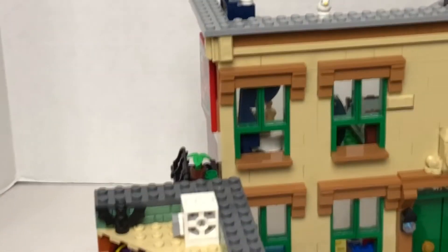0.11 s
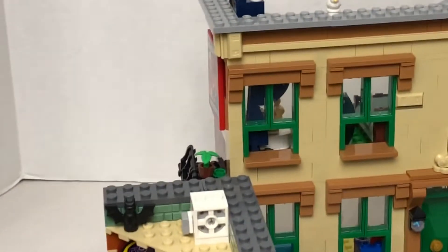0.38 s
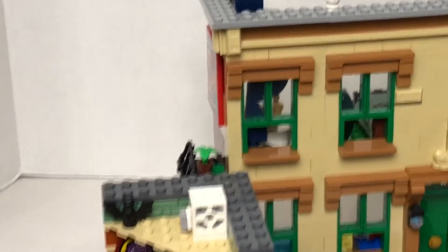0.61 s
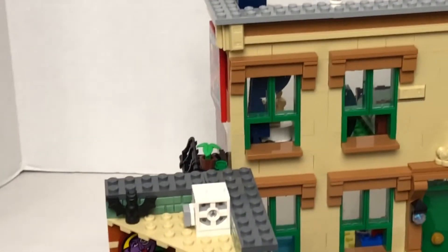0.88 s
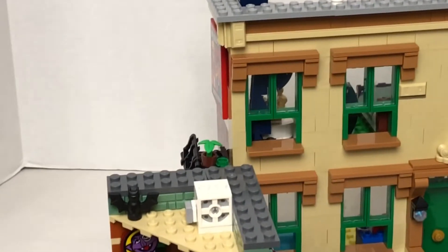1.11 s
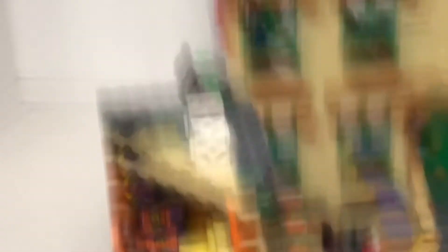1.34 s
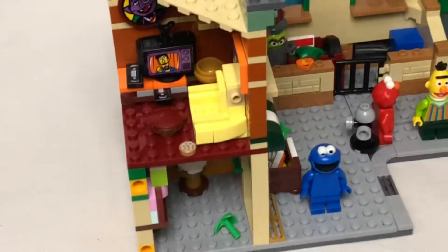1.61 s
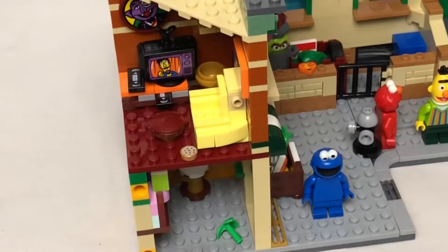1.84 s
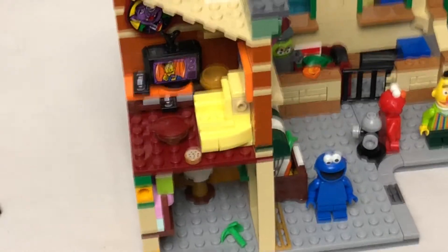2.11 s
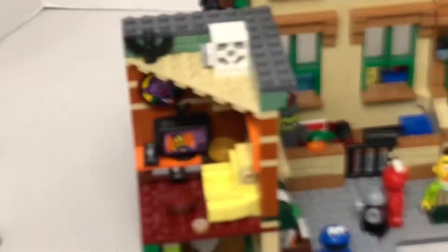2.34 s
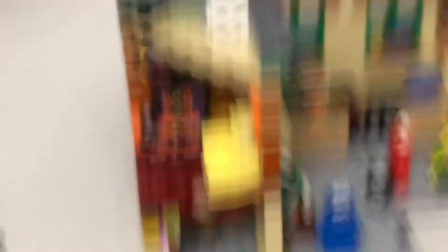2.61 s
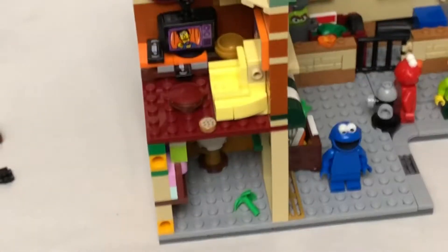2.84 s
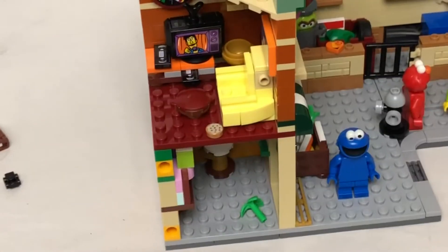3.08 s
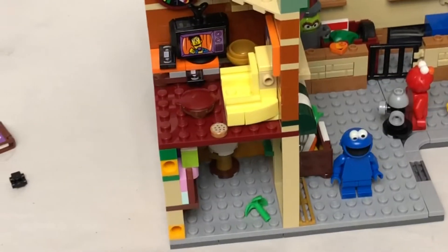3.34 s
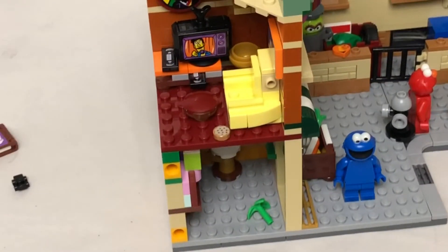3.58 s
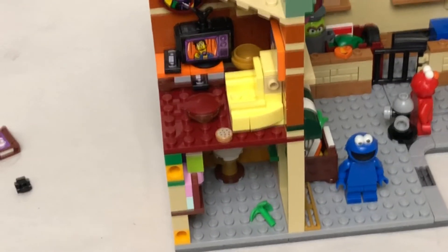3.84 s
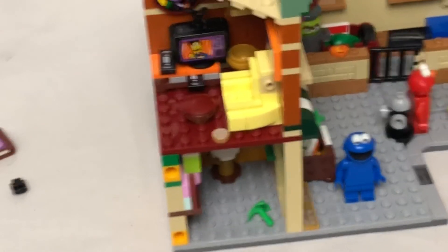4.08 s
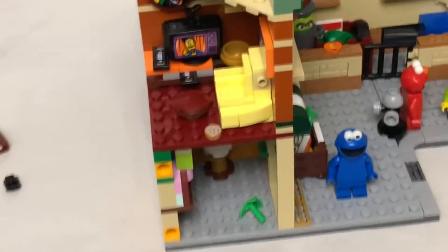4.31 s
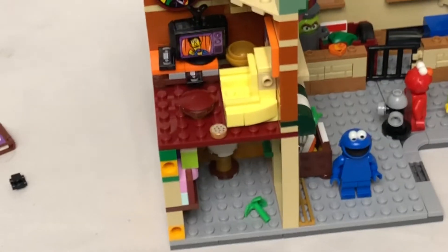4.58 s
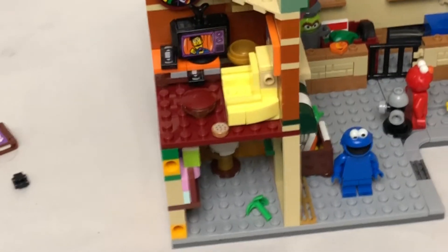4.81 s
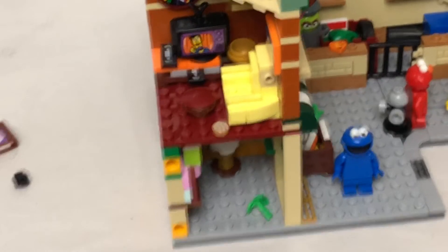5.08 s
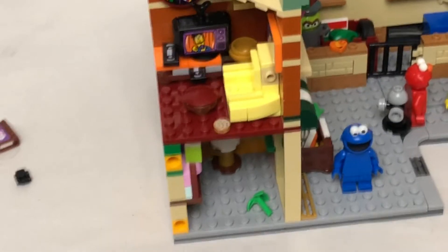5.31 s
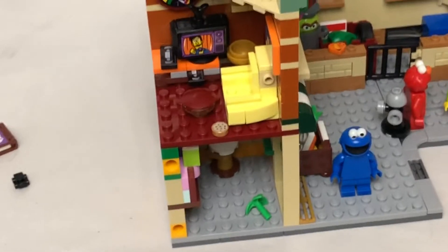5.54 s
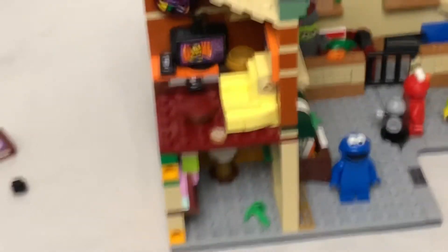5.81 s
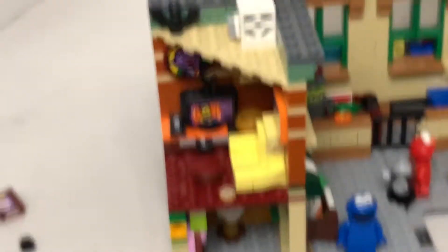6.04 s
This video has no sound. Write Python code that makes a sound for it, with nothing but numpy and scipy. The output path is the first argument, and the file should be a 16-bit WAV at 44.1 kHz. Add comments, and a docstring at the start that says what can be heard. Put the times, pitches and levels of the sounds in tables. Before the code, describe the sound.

A quiet indoor room with faint hiss and low rumble, recorded very close. Soft finger rubbing and a few tiny clicks fill the first second. At 1.24 s a hard, very loud plastic snap strikes with a table thump, bright little bounces and a brief hollow hum. Small knocks follow, then an equally loud snap at 2.14 s, with three or four ticking bounces and quick rocking thuds; looser clacks rattle around 2.4 to 2.5 s with a faint thin ringing. A single crisp clack lands at 2.85 s. It is almost still until 3.8 s, when hands shuffle and skin rubs dryly; a blunt tap on the camera body comes at 4.0 s. From about 4.8 to 5.25 s a base drags in low stuttering slips, growing stronger. Medium clicks cluster at 5.6 to 5.76 s, the last sharpest, then soft body taps and one more click near 5.95 s.

```python
"""Plastic building pieces on a table

Small pieces are pressed, snapped and dropped close to a microphone in a quiet room. Contacts are bursts of
noise through resonances; tiny loose parts, a thin part and a wall of the model ring as decaying sines.
Knocks through the table and a dragged base are sines that sag in pitch; taps on the camera body dive.
Finger rubs, shuffling hands and the floor are coloured noise; a diffuse room tail answers the contacts."""
import sys
import numpy as np
from scipy import signal
from scipy.fft import rfft, irfft
from scipy.io import wavfile
from scipy.ndimage import uniform_filter1d, map_coordinates

SR = 44100
rng = np.random.default_rng(int(sys.argv[2]) if len(sys.argv) > 2 else 0)


def persist_wave(psi):
    """Save psi, clipped to +-1, as 16-bit WAV."""
    counts = np.round(np.clip(psi, -1, 1) * 32767).astype(np.int16)
    wavfile.write(sys.argv[1], SR, np.atleast_2d(counts).T)


def undo_db(level):
    """Turn decibels back into plain size, where 20 dB means ten times bigger."""
    steps = np.asarray(level, float) / 20
    return 10 ** steps


N = 272297


def unit(x):
    """Scales to rms 1."""
    return x / np.sqrt(np.mean(x ** 2) + 1e-20)


def along(points, hz):
    """Interpolates (f/Hz, value) points on a log frequency axis."""
    f, v = np.transpose(points)
    return np.interp(np.log(hz + 1), np.log(f + 1), v)


def coloured(response):
    """Noise of rms 1 shaped by a gain per frequency."""
    spectrum = rfft(rng.standard_normal(N))
    return unit(irfft(spectrum * response(np.fft.rfftfreq(N, 1 / SR)), N))


def wobble(rate_hz):
    """Smooth random curve with rate_hz knots a second."""
    knots = rng.standard_normal(int(N * rate_hz / SR) + 4)
    return map_coordinates(knots, [np.arange(N) * rate_hz / SR])


def fading(t, t60_ms, rise_ms):
    """Quick rise times exponential fall."""
    return (1 - np.exp(-1000 * t / rise_ms)) * undo_db(-60000 * t / t60_ms)


def tone(t, hz):
    """Sine at a random phase."""
    return np.sin(2 * np.pi * (hz * t + rng.random()))


def add(track, s, sound):
    """Mixes a sound in at s seconds."""
    part = track[int(round(s * SR)):][:len(sound)]
    part += sound[:len(part)]


# finger strokes over plastic: start/s, end/s, level/dB, treble/dB
RUB_STROKES = [(-.02, 0.135, -73.5, 7.5), (0.121, 0.17, -68, 10), (0.158, 0.3, -72.5, 10),
               (1.95, 2.06, -72.5, 10), (3.847, 3.993, -64, -4), (3.986, 4.211, -65, 2.5),
               (4.043, 4.126, -62.5, 26), (4.203, 4.318, -64, 5), (4.669, 4.716, -72.5, -4),
               (4.84, 4.87, -75, -7.5), (5.274, 5.325, -66, -14.5), (5.394, 5.619, -70.5, 0.5)]
# skin friction spectrum: f/Hz, gain/dB
SKIN_COLOUR = [(350, -50), (600, 5.5), (1900, 1.5), (2830, 2.5), (3300, -6.5), (4840, 0.5), (10900, -10),
               (16000, -10.5)]
# resonances of the rubbed piece: f/Hz, width/Hz, level/dB
RUBBED_PIECE = [(3130, 86, -0.5), (3680, 110, -1), (4850, 110, -6), (7160, 160, -6.5), (10900, 160, -4.5)]


def rubs():
    """Skin slides over plastic: patchy noise swells per stroke; the grip changes which resonances sing."""
    t, out = np.arange(N) / SR, 0
    for start, end, db, treble_db in RUB_STROKES:
        grip = [(c * rng.normal(1, .01), w, g + rng.normal(0, 2.5)) for c, w, g in RUBBED_PIECE]

        def skin(f):
            rings = sum(undo_db(g + 8.5) * w / np.hypot(2 * (f - c), w) for c, w, g in grip)
            high = (f / 9000) ** 2
            return undo_db(along(SKIN_COLOUR, f)) * (1 + rings) * (1 + undo_db(treble_db) * high / (1 + high))

        swell = np.abs(np.sin(np.pi * np.clip((t - start) / (end - start), 0, 1))) ** 0.53
        out = out + undo_db(db) * swell * coloured(skin)
    z = signal.stft(out, nperseg=256)[2]
    patches = uniform_filter1d(rng.standard_normal(z.shape), size=5, axis=0)  # across frequency
    patches = uniform_filter1d(patches, size=8, axis=1)  # across time
    out = signal.istft(z * undo_db(2.1 * unit(patches)), nperseg=256)[1][:N]
    return out * undo_db(0.63 * wobble(55) + 0.55 * wobble(350))


# hand activity: t/s, level/dB
HAND_LEVELS = [(0, -67), (0.299, -69.5), (1.2, -75), (1.7, -68), (2.6, -64), (3.099, -76), (3.73, -72),
               (3.8, -57), (3.88, -66.5), (4.199, -67), (4.5, -76.5), (5.2, -65.5), (5.9, -61), (6.17, -79)]
# shuffling spectrum: f/Hz, gain/dB
SHUFFLE_COLOUR = [(60, -31.5), (120, -3.5), (200, 0), (400, -8), (900, -24.5), (2000, -50)]


def hand_level():
    """Gain of the hand activity over time."""
    return undo_db(np.interp(np.arange(N) / SR, *np.transpose(HAND_LEVELS)))


def hands():
    """Lumpy low noise of hands and camera shifting."""
    lumps = undo_db(3.5 * wobble(25))
    return hand_level() * unit(lumps * coloured(lambda f: undo_db(along(SHUFFLE_COLOUR, f))))


# hiss and rumble spectrum: f/Hz, gain/dB
FLOOR_COLOUR = [(28, -12.5), (52, 7.5), (70, 2.5), (120, -8.5), (250, -14.5), (500, -14.5), (1000, -22),
                (5000, -28.5), (12000, -32), (15800, -33.5), (16300, -49.5)]
FLOOR_DB = -67.5


def floor():
    """Faint hiss and rumble: coloured noise with a slightly wavering level."""
    return undo_db(FLOOR_DB + 0.18 * wobble(2.8)) * coloured(lambda f: undo_db(along(FLOOR_COLOUR, f)))


# plastic contacts: t/s, level/dB, body/dB, edge/dB, room/dB (lower when close to the microphone)
CONTACTS = [(0.3665, -55, -6.5, -2, 10), (0.452, -60.5, 0, -5, -4), (0.641, -46, -3.5, -0.5, -6),
            (1.218, -59.5, 3, -1, 23), (1.2407, -9.5, -11, 4.5, -1), (1.2427, -12, -6.5, -7, 3),
            (1.395, -49.5, 6, -1.5, 9.5), (1.661, -63, 4, -16, -0.5), (1.8576, -44.5, 9, -8.5, -2),
            (2.118, -55, -0.5, -5, 7), (2.1397, -8, -10.5, -3, 0), (2.397, -40.5, 4, 5, 0),
            (2.4376, -40, 2.5, -16, 6.5), (2.459, -40, -14, -13, -4.5), (2.4747, -24, -7.5, -9, 7),
            (2.4928, -33, -2.5, -4, -7), (2.5, -46, 3, -4, -2), (2.756, -41, -1, -10.5, 0),
            (2.8531, -17, -12, -6, -0.5), (2.914, -54.5, 7, -2.5, 3), (3.8995, -47.5, -16.5, -13.5, -3),
            (3.9979, -45, -7.5, -3, 4), (4.6677, -58, -5.5, -12.5, -0.5), (4.683, -56.5, -5, -2, 0.5),
            (4.956, -69, 8.5, -3.5, -3), (5.052, -75, 9, -6, -1), (5.14, -40, -3.5, -8, 1.5),
            (5.1767, -45.5, 8, -13, -2), (5.413, -55, 1.5, -3.5, 1), (5.432, -56, 1.5, -8, -2),
            (5.596, -51.5, 12.5, -17, 1), (5.6177, -31.5, -3, -1, -2), (5.6278, -34.5, 2, -18, -10),
            (5.6348, -36.5, 0.5, -0.5, 3.5), (5.7204, -28, -2.5, -5, 1), (5.763, -19, -7, -4.5, 0.5),
            (5.9438, -49, 2.5, -17, -1), (5.975, -28.5, -3.5, -10, -0.5)]
# crack regions body, middle, edge: low/Hz, high/Hz (capped at 0.45 SR), share of CRACK_T60_MS
CRACK_REGIONS = [(700, 2810, 1.8), (2780, 7000, 0.73), (6550, 34000, 0.53)]
# resonances of the pieces: f/Hz, width/Hz, level/dB
PIECE_MODES = [(1295, 110, 4.5), (1696, 150, 3.5), (2180, 200, 4), (2960, 260, 1), (3669, 580, 6.5),
               (4170, 160, 7), (4500, 710, 0.5), (5650, 260, -1.5), (8300, 660, 4)]
CRACK_T60_MS = 23
SNAP_DB, RING_IN_ROOM_DB = -9.5, -7  # snap relative to crack; ringing in the walls' feed


def clicks():
    """Snap and noise crack ring the pieces, treble dying first; also returns pulses for the room, each with its
    crack band's energy scaled by the contact's room level."""
    out, spread, t = np.zeros(N), np.zeros(N), np.arange(4096) / SR
    f = np.fft.rfftfreq(len(t), 1 / SR)

    def mode(c, w, db):
        return undo_db(db) * 1j * f * w / (c * c - f * f + 1j * f * w)

    bands = [signal.butter(3, [lo, min(hi, .45 * SR)], "band", fs=SR, output="sos")
             for lo, hi, _ in CRACK_REGIONS]
    for s, db, body_db, edge_db, room_db in CONTACTS:
        rings = sum(mode(c * rng.normal(1, 0.022), w, g + rng.normal(0, 2.5)) for c, w, g in PIECE_MODES)
        noise = irfft(rfft(rng.standard_normal((len(CRACK_REGIONS), len(t)))) * (1 + rings))
        snap, pulse = irfft(1 + rings), irfft(1 + undo_db(RING_IN_ROOM_DB) * rings)
        region_dbs = (body_db, 0, edge_db)
        for band, grit, region_db, (_, _, share) in zip(bands, noise, region_dbs, CRACK_REGIONS):
            crack = unit(signal.sosfilt(band, grit)) * fading(t, share * CRACK_T60_MS, rise_ms=0.16)
            crack = undo_db(db + region_db - 4.0) * crack
            size = np.linalg.norm(crack)
            first = signal.sosfilt(band, snap)
            bare = signal.sosfilt(band, pulse)
            crack = crack + undo_db(SNAP_DB) * first * size / np.linalg.norm(first)
            add(out, s - .0003, crack)
            add(out, s + 0.0055, undo_db(-18.5) * crack)  # bounce off the table top
            add(spread, s, undo_db(room_db) * bare * size / np.linalg.norm(bare))
    return out, spread


# reverberation time: f/Hz, t60/s
ROOM_T60 = [(300, 0.14), (1500, 0.43), (3500, 0.52), (5200, 0.45), (7000, 0.32), (9500, 0.33),
            (15000, 0.32)]
# tail spectrum: f/Hz, gain/dB
TAIL_COLOUR = [(500, -2.5), (900, -3), (1500, 2.7), (2400, -2.5), (3400, 0.1), (4500, -5.5), (6500, -1.5),
               (10000, -8.5), (15000, -11)]


def room(x):
    """Diffuse noise tail, each frequency with its own decay; every 4096-sample block gets a fresh tail."""
    out, step = np.zeros(N + SR), 4096
    for start in range(0, N, step):
        hz, t, z = signal.stft(rng.standard_normal(SR // 2), SR, nperseg=256)
        decay_db = along(TAIL_COLOUR, hz)[:, None] - 60 * t / along(ROOM_T60, hz)[:, None]
        tail = signal.istft(z * undo_db(decay_db), SR, nperseg=256)[1]
        answer = signal.fftconvolve(x[start:start + step], tail / np.linalg.norm(tail))
        add(out, start / SR + .006, answer)
    return out[:N]


# hollow of the model: f/Hz, level/dB, t60/ms
HOLLOW_MODES = [(335, -3.5, 12), (491, -4.5, 25.6), (614, -3, 24), (800, -9, 7.7), (1153, -2.5, 7.8)]
# table top: f/Hz, level/dB, t60/ms
TABLE_MODES = [(92, -1, 54), (132, 5, 67)]
SWING_CYCLES = 8.3  # cycles until the swing is 60 dB down


def knock(rows):
    """Bending waves bring highs first: the swing sags in pitch, lower hollow and table modes arrive later."""
    out, t = np.zeros(N), np.arange(8192) / SR
    for s, db, hz, hollow_db in rows:
        cycles = hz * (t + 0.65 * 0.0037 * (1 - np.exp(-t / 0.0019)))
        swing = np.sin(2 * np.pi * cycles) * fading(t, 1000 * SWING_CYCLES / hz, rise_ms=750 / hz)
        add(out, s - .005 + 0.082 / np.sqrt(hz), undo_db(db + 8.0) * swing)
        for modes, part_db, rise_ms in ((HOLLOW_MODES, hollow_db + 4.5, 1.2), (TABLE_MODES, -6, 8)):
            for mode_hz, mode_db, t60_ms in modes:
                ring = tone(t, mode_hz * rng.normal(1, 0.044)) * fading(t, t60_ms, rise_ms)
                travel_s = 0.098 / np.sqrt(mode_hz)
                level_db = db + part_db + mode_db + rng.normal(0, 2.6)
                add(out, s - .005 + travel_s, undo_db(level_db) * ring)
    return out


# single knocks through the table: t/s, level/dB, settled pitch f/Hz, hollow/dB
SINGLE_KNOCKS = [(0.454, -48, 208, -4.5), (0.647, -52, 170, 1), (1.242, -32, 148, 16.5),
                 (1.252, -27, 124, 2), (1.398, -41.5, 212, -9), (1.434, -48, 223, -5.5),
                 (1.647, -52.5, 171, -3.5), (1.801, -49, 171.7, -3), (1.86, -38.5, 162, -1),
                 (1.959, -53.5, 231, -18), (2.111, -42.5, 241, -11), (2.14, -30.5, 164.6, 8),
                 (2.28, -45, 243, -3), (2.441, -40, 148, 0.5), (2.478, -39, 326, 17.5),
                 (2.631, -45.5, 270, -3.5), (2.722, -50.5, 224, -6.5), (2.744, -51.5, 171, 6.5),
                 (2.856, -33.5, 155.7, 1), (3.483, -52.5, 139, -12), (3.773, -44.5, 129.2, -13),
                 (3.805, -44, 179.3, -9.5), (3.832, -49, 159.5, -13.5), (3.903, -40.5, 170, -11),
                 (4.013, -51, 232, 6), (4.028, -53.5, 196, 6), (4.265, -52, 216.3, -8),
                 (4.671, -46.5, 160.5, -9.5), (5.429, -53, 188.3, -9), (5.601, -43, 189, -6.5),
                 (5.618, -40.5, 179, -9), (5.723, -38, 167, 3), (5.764, -32.5, 159, 4.5),
                 (5.978, -34.5, 169, 1)]


def thuds():
    """Single blows bend the table top and ring the hollow model."""
    return knock(SINGLE_KNOCKS)


FUMBLES, FUMBLE_DB, FUMBLE_SCATTER_DB, FUMBLE_HZ, FUMBLE_HOLLOW_DB = 14, -59, 2, 205, -12.5


def fumbles():
    """Faint knocks at chance times, likelier where the hands are busy."""
    busy = np.cumsum(hand_level())
    rows = []
    for _ in range(FUMBLES):
        s = np.searchsorted(busy, rng.random() * busy[-1]) / SR + 0.0099
        db = FUMBLE_DB + FUMBLE_SCATTER_DB * rng.standard_normal()
        hz = FUMBLE_HZ * np.exp(0.15 * rng.standard_normal())
        rows.append((s, db, hz, FUMBLE_HOLLOW_DB))
    return knock(rows)


# hum onsets: t/s, level/dB
WALL_HUMS = [(1.245, -47), (1.861, -65), (2.144, -53), (2.856, -63)]
WALL_HZ, WALL_T60_MS = 1335, 450


def wall():
    """A wall of the model hums on after some blows: one narrow mode, wavering in strength."""
    out, t = np.zeros(N), np.arange(SR // 2) / SR
    for s, db in WALL_HUMS:
        add(out, s, undo_db(db) * tone(t, WALL_HZ) * fading(t, WALL_T60_MS, rise_ms=3.7))
    return out * undo_db(3 * wobble(60))


# bounces of a tiny loose part: t/s, level/dB, edge/dB, lowest mode f/Hz
BOUNCES = [(1.253, -19, 9.5, 4900), (1.2609, -21.5, 3.5, 6300), (1.2836, -28, 2, 6500),
           (1.2935, -26.5, 2.5, 6000), (2.1616, -22, 6.5, 6000), (2.1707, -21.5, 5.5, 5800),
           (2.1802, -23.5, 3.5, 6000), (2.5047, -28, -1, 6000)]
# its modes above the lowest: f/Hz, level/dB, t60/ms
PART_MODES = [(8450, -9, 1.5), (10500, -4.5, 2.4), (13320, -5.5, 1.3), (15280, -3.5, 2.2)]
LOWEST_DB, LOWEST_T60_MS = 1, 3.2


def ticks():
    """A tiny part rings at a few high modes, with new phases at each bounce."""
    out, t = np.zeros(N), np.arange(1024) / SR
    for s, db, edge_db, lowest_hz in BOUNCES:
        modes = [(hz * rng.normal(1, 0.046), mode_db + edge_db, t60_ms) for hz, mode_db, t60_ms in PART_MODES]
        modes.append((lowest_hz, LOWEST_DB, LOWEST_T60_MS))
        for hz, mode_db, t60_ms in modes:
            ring = tone(t, hz) * fading(t, t60_ms, rise_ms=0.056)
            add(out, s - .0003, undo_db(db + mode_db + 7.0) * ring)
    return out


# rocking after hard blows: first knock t/s, level/dB, number of knocks
ROCKINGS = [(2.152, -32, 3), (2.49, -32, 3)]
ROCK_GAP_S, ROCK_HZ, ROCK_HOLLOW_DB = .0105, 127.47, 4


def rocks():
    """The model rocks on its base: evenly spaced knocks of equal level."""
    return knock([(s + k * ROCK_GAP_S, db, ROCK_HZ, ROCK_HOLLOW_DB)
                  for s, db, count in ROCKINGS for k in range(int(count))])


# brushes against a thin hard part: t/s, level/dB
THIN_BRUSHES = [(2.46, -61), (2.5, -58)]
# its modes: f/Hz, level/dB, t60/ms
THIN_MODES = [(3850, 0, 520), (4030, -5, 300), (4200, -9, 220)]


def thin_part():
    """Close narrow modes sing on after each brush, fluttering as the part rattles."""
    out, t = np.zeros(N), np.arange(SR // 2) / SR
    for s, db in THIN_BRUSHES:
        for hz, mode_db, t60_ms in THIN_MODES:
            add(out, s, undo_db(db + mode_db) * tone(t, hz) * fading(t, t60_ms, rise_ms=1.3))
    return out * undo_db(3 * wobble(110))


# fingertip taps on the camera body: t/s, level/dB, starting pitch f/Hz
BODY_TAPS = [(3.9997, -27.5, 1017), (5.92, -37.5, 1013), (5.9468, -42.5, 920)]
TAP_SAG_S, TAP_PEAK_S = .0031, .0024


def taps():
    """Dry push through the shell, highs first: the pitch dives within a few swings and leaves no ring."""
    out, t = np.zeros(N), np.arange(2048) / SR
    swell = (t / TAP_PEAK_S * np.exp(1 - t / TAP_PEAK_S)) ** 2
    for s, db, hz in BODY_TAPS:
        cycles = hz * TAP_SAG_S * (1 - np.exp(-t / TAP_SAG_S))
        add(out, s, undo_db(db) * swell * np.sin(2 * np.pi * cycles))
    return out


# slips of a dragged base: t/s, level/dB
BASE_SLIPS = [(4.783, -56.5), (4.854, -55.5), (4.899, -52), (4.939, -54), (4.956, -49), (5.010, -48),
              (5.021, -52.5), (5.054, -49), (5.07, -47), (5.104, -45.5), (5.157, -44), (5.189, -40.5),
              (5.222, -41), (5.253, -40)]
SLIP_START_HZ, SLIP_END_HZ, SLIP_SAG_S = 735, 144.8, 0.0026  # typical pitches, scattered per slip
SLIP_T60_MS, SLIP_GRIT_DB = 57, -18.5


def slips():
    """A dragged base sticks and slips: each slip jolts the table, highs first, with grit on its front."""
    out, t = np.zeros(N), np.arange(4096) / SR
    for s, db in BASE_SLIPS:
        start_hz = SLIP_START_HZ * np.exp(rng.normal(0, 0.19))
        end_hz = SLIP_END_HZ * rng.normal(1, 0.16)
        cycles = end_hz * t + (start_hz - end_hz) * SLIP_SAG_S * (1 - np.exp(-t / SLIP_SAG_S))
        jolt = -np.sin(2 * np.pi * cycles) * fading(t, SLIP_T60_MS, rise_ms=1.36)
        grit = uniform_filter1d(rng.standard_normal(len(t)), size=4) * fading(t, 40, rise_ms=0.73)
        add(out, s - .001, undo_db(db + 3.5) * (jolt + undo_db(SLIP_GRIT_DB) * grit))
    return out


def scene():
    """Sums all contacts, their room tail, the rubbing and the floor."""
    background = rubs() + hands() + floor()
    cracks, spread = clicks()
    dull = thuds() + fumbles() + rocks()
    bounces = ticks() + thin_part()
    wet = undo_db(-17.0) * room(spread + .5 * bounces + 1.2 * dull)
    return (background + cracks + dull + bounces + wet + wall() + taps() + slips())[None]


def top_cut(x):
    """Nothing passes above the cut-off."""
    return signal.sosfilt(signal.butter(12, 17340, fs=SR, output="sos"), x)


def record(dry):
    """The microphone's bass cut, then a steep band limit."""
    bass_cut = signal.sosfilt(signal.butter(2, 45, "high", fs=SR, output="sos"), dry)
    limited = signal.sosfilt(signal.cheby2(12, 70, 17500, fs=SR, output="sos"), bass_cut)
    return top_cut(limited)


dry = scene()
out = record(dry)
persist_wave(out)
```